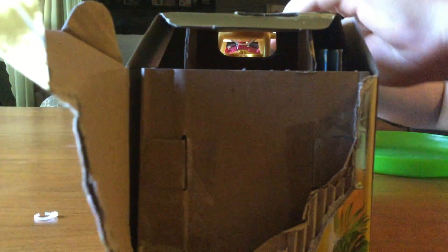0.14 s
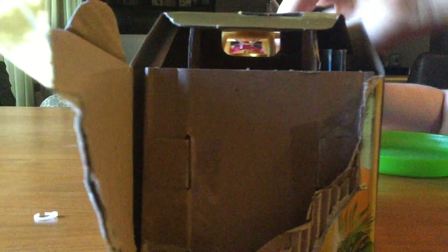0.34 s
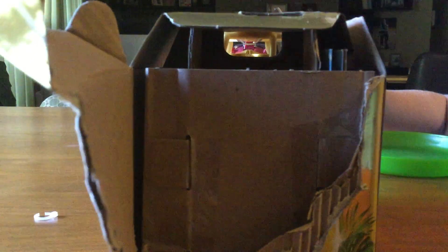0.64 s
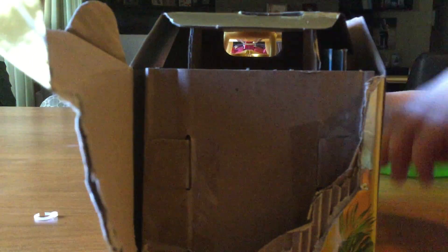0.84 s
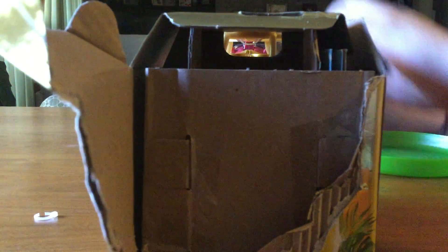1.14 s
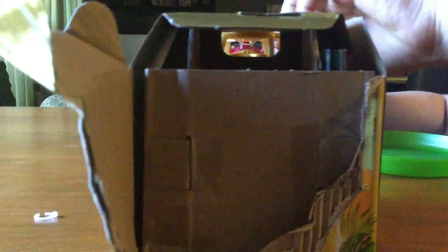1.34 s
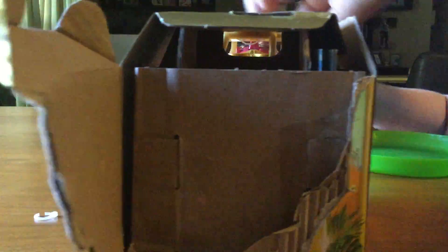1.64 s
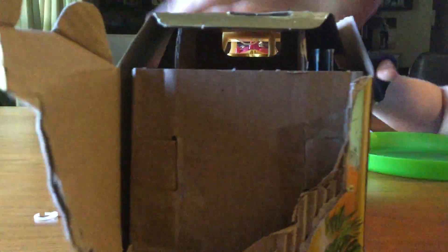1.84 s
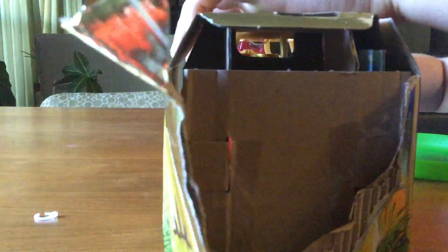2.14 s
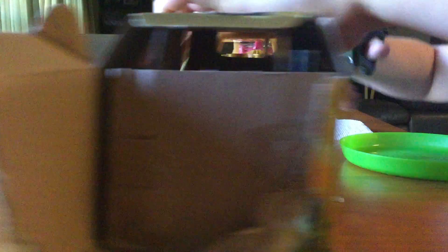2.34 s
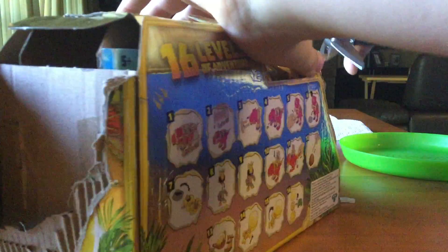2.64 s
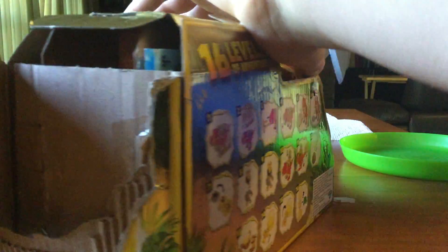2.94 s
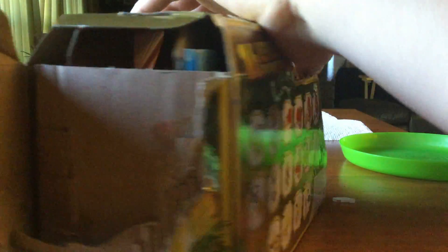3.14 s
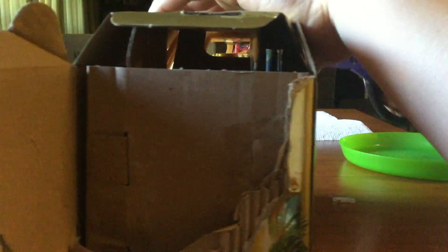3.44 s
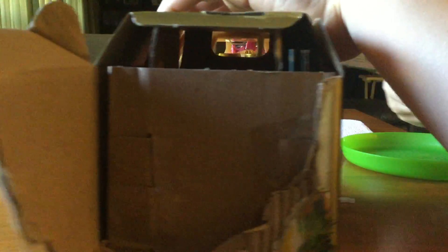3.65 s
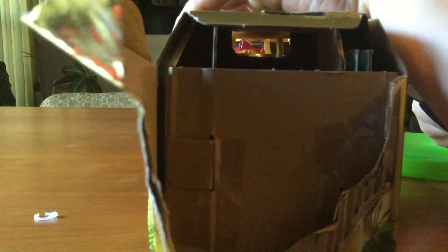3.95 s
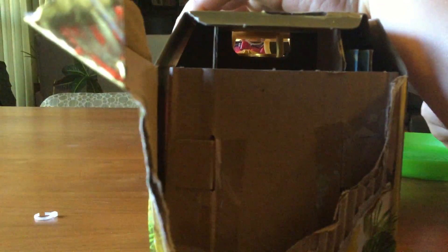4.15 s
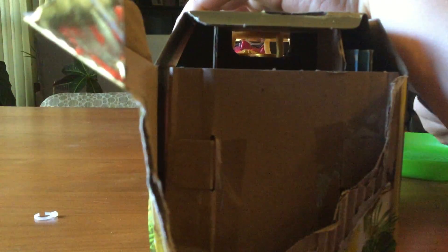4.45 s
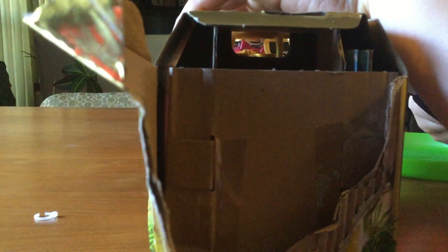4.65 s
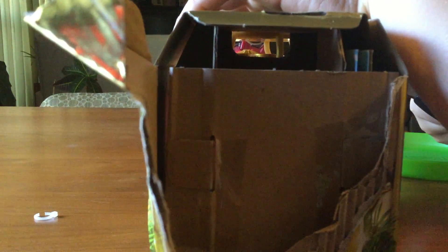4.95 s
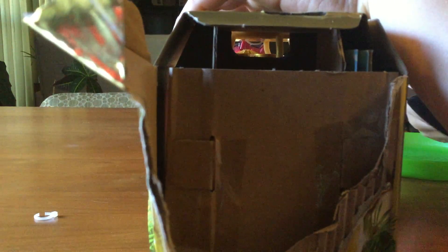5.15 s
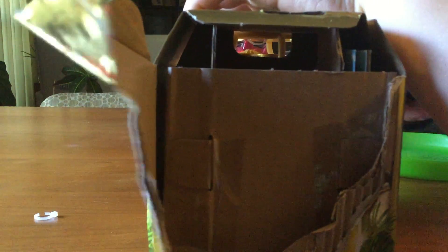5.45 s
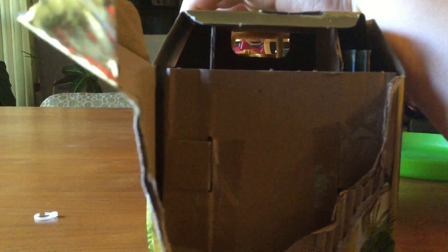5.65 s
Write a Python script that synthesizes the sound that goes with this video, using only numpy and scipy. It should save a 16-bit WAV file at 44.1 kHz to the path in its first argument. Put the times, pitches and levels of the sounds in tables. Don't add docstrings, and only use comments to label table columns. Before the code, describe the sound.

A close, small camera microphone in a quiet room picks up handling of a cardboard box on a wooden table. Light snips and card taps begin at 0.1 s, with more at 0.3 s, building to a hard double crack at 0.43-0.47 s as plastic snaps and the box walls knock. It goes nearly quiet, with faint crackles around 1.1-1.4 s and a small click at 1.6 s. At 1.88 s a very sharp snap lands with a dull thump, and the box starts to scrape. The dry, hissing drag swells, strongest around 2.4-2.7 s, with little clicks inside it. A deep double thud comes near 3.46 s, a crisp snap at 3.58 s, and the scraping fades by 4 s. Afterwards there are isolated taps at 4.6, 5.1 and 5.35 s, then a small cluster of cracks and rustle from 5.5 to 5.8 s, over soft room hush and short reflections.

```python
import sys
import numpy as np
from scipy import signal
from scipy.fft import rfft, irfft
from scipy.io import wavfile
from scipy.ndimage import uniform_filter1d

SR = 44100
rng = np.random.default_rng(int(sys.argv[2]) if len(sys.argv) > 2 else 0)


def materialize(psi):
    bounded = np.clip(np.atleast_2d(psi).T, -1, 1)
    quanta = np.round(bounded * 32767).astype(np.int16)
    wavfile.write(sys.argv[1], SR, quanta)


def invert_db(x):
    u = np.asarray(x, float) / 20
    return 10 ** u


N = 255339

# pitch_hz [Hz], level_db [dB], t60_s [s]
TABLE_MODES = [(40, -11.5, 0.23), (61, -8, 0.29), (83, -3.5, 0.11), (124, -1.5, 0.22), (166.8, -7.5, 0.23),
               (209, -4.5, 0.16), (288.4, -4, .12)]
# pitch_hz [Hz], level_db [dB], t60_s [s]
FLAP_MODES = [(380, 3, 0.035), (458, -7, 0.064), (545, 6, 0.027), (644, 6, 0.029), (784, 3.5, 0.04),
              (863, -7.5, .04)]
# pitch_hz [Hz], level_db [dB], t60_s [s]
WALL_MODES = [(1160, -1.5, 0.016), (1374, -9, 0.026), (1477, -4, 0.015), (1630, -2, 0.0098),
              (1766, -4, 0.013), (2125, -7.5, 0.011), (2528, -11, 0.009)]
# pitch_hz [Hz], level_db [dB], t60_s [s]
BLADE_MODES = [(7280, -1, 0.0011), (9400, -5, 0.0013), (11050, -1.5, 0.0017), (12900, -0.5, 0.001),
               (15200, -9, 0.0035)]
# time_s [s], pitch_hz [Hz], fizz_share_db [dB]
EDGE_PITCH = [(.35, 4200, -14.5), (1.2, 4200, -8), (1.65, 4170, -16), (2.24, 4290, -15), (2.34, 4710, -18),
              (2.54, 5300, -14), (2.69, 4740, -9.5), (2.84, 5480, -17), (2.93, 4580, -19.5),
              (3.05, 4340, -17.5), (3.4, 4790, -16.5), (3.56, 4250, -21), (3.7, 4230, -10),
              (3.84, 3936, -16.5), (4.1, 4220, -16), (5.55, 4290, -19.5)]


def evened(x):
    return x / np.sqrt(np.mean(x ** 2) + 1e-20)


def peaked(x, db, ms):
    power = uniform_filter1d(x ** 2, int(ms * SR / 1000))
    return invert_db(db) * x / np.sqrt(power.max())


def read(points, hz):
    f, value = np.transpose(points)
    return np.interp(np.log(hz + 1), np.log(f + 1), value)


def add(mix, s, sound):
    part = mix[round(s * SR):][:len(sound)]
    part += sound[:len(part)]


def in_time(rows):
    return sorted(rows, key=lambda row: round(row[0] * 200))


def ring(modes, near_hz=1000, fall_db=0, sign=-1):
    longest_s = max(t60 for *_, t60 in modes)
    t = np.arange(int(longest_s * SR)) / SR
    out = np.zeros(len(t))
    for k, (hz, db, t60) in enumerate(modes):
        level_db = db - fall_db * abs(np.log2(hz / near_hz))
        build_up = 1 - np.exp(-2.5 * hz * t)
        out += invert_db(level_db - 60 * t / t60) * np.sin(2 * np.pi * hz * t) * sign ** k * build_up
    return out


def breaks(ms, share):
    t = np.arange(2048) / SR
    clean = np.arange(len(t)) == 45
    run = rng.standard_normal((len(ms), len(t))) * (1 - np.exp(-t / 0.0029))
    run *= np.exp(-1000 * t / np.clip(ms, .3, 12)[:, None])
    return share * run / np.linalg.norm(run, axis=1, keepdims=True) + clean


def slips(per_s, size_db, flutter_db, flutter_ms):
    size = invert_db(size_db * np.minimum(rng.exponential(1, N), 4)) * rng.standard_normal(N)
    size *= rng.random(N) < per_s / SR
    width = int(flutter_ms * SR / 1000)
    flutter = uniform_filter1d(uniform_filter1d(rng.standard_normal(N), width), width)
    return size * invert_db(flutter_db * evened(flutter))


def swells(rows):
    t = np.arange(0, N / SR + .002, .001)
    power = np.zeros(len(t))
    for top, rise, fall, db in rows:
        away = np.where(t < top, (top - t) / rise, (t - top) / fall)
        power += invert_db(db - 26 * away ** 1.386) ** 2
    return np.interp(np.arange(N) / SR, t, np.sqrt(power))


def hush():
    # pitch_hz [Hz], level_db [dB per Hz]
    hush_colour = [(26, -36), (45, -6), (81, -1.5), (166, 0), (372, -10.5), (640, -20.5), (706, -14.5),
                   (880, -26), (1070, -22.5), (2730, -31.5), (4140, -26.5), (7470, -36), (8450, -33),
                   (14900, -38), (16000, -48.5)]
    hz = np.fft.rfftfreq(N, 1 / SR)
    spectrum = rfft(rng.standard_normal(N)) * invert_db(read(hush_colour, hz))
    return invert_db(-67) * evened(irfft(spectrum, N))


def room(x):
    # pitch_hz [Hz], t60_s [s]
    room_decay = [(100, 0.45), (500, .5), (1500, 0.53), (4500, 0.48), (9000, 0.45), (15000, 0.089)]
    # pitch_hz [Hz], level_db [dB]
    room_colour = [(100, 0), (400, -4), (1500, -4.5), (5000, -4.5), (14000, 1)]
    taps = np.zeros(SR)
    at = np.arange(300, SR - 20, 20)
    taps[at + rng.integers(0, 20, len(at))] = rng.choice([-1., 1.], len(at))
    hz, t, z = signal.stft(taps, SR, nperseg=256)
    gain = invert_db(read(room_colour, hz)[:, None] - 60 * t / read(room_decay, hz)[:, None])
    tail = signal.istft(z * gain, SR, nperseg=256)[1]
    return invert_db(-13) * signal.fftconvolve(x, tail / np.linalg.norm(tail))[:N]


def far_wall(x):
    t = np.arange(1500) / SR
    smear = rng.standard_normal(len(t)) * np.exp(-t / 0.021)
    echo = signal.oaconvolve(x, smear / np.linalg.norm(smear))[:N]
    return invert_db(-17.0) * np.roll(echo, round(0.031 * SR))


def rumble():
    # time_s [s], level_db [dB]
    weight = [(0.0, -45.5), (0.112, -55), (0.45, -77), (0.98, -74.5), (1.51, -58), (1.8, -70),
              (2.05, -58.5), (2.53, -54.5), (2.72, -52), (2.97, -48.5), (3.32, -63.5), (3.59, -41),
              (3.64, -57.5), (4.22, -64), (4.39, -70.5), (5.35, -76.5), (5.63, -51), (5.79, -67)]
    s, db = np.transpose(weight)
    shifts = slips(per_s=270, size_db=2.1, flutter_db=2.8, flutter_ms=40.0)
    hum = signal.oaconvolve(shifts, ring(TABLE_MODES))[:N]
    return invert_db(np.interp(np.arange(N) / SR, s, db) - 9.5) * evened(hum)


def bumps():
    # time_s [s], blow_db [dB], loudest_hz [Hz], contact_ms [ms]
    bump_events = [(0.113, -48, 262, 2.1), (0.348, -49, 190, 1.95), (0.441, -40, 299, 2.4),
                   (0.474, -46, 197.3, 2.05), (1.885, -39, 290, 2.14), (1.89, -31, 141, 4.6),
                   (1.988, -45, 261, 1.1), (2.494, -54, 122, 4), (2.769, -40.5, 98, 9.7),
                   (2.976, -45.5, 107, 1.9), (3.02, -46, 106, 2.3), (3.049, -53.5, 195, 1.9),
                   (3.459, -26, 109.6, 5), (3.47, -27, 86, 5.1), (3.742, -49.5, 301, 3),
                   (3.985, -40.5, 117.3, 1.6), (3.789, -52.5, 61, 8.1), (4.629, -43.5, 195, 2.34),
                   (4.981, -52.5, 119, 5.5), (5.063, -51.5, 184, 1.5), (5.079, -56.5, 76, 3.3),
                   (5.458, -55.5, 78.5, 5.4), (5.554, -43.5, 221, 6.3), (5.589, -64.5, 191, 3.5)]
    out = np.zeros(N)
    for s, db, hz, ms in bump_events:
        push = np.hanning(int(np.clip(ms, .5, 12) * SR / 1000))
        thud = signal.fftconvolve(push, ring(TABLE_MODES, hz, fall_db=9.5))
        add(out, s - 1.3 * ms / 1000, peaked(thud, db - 2.0, 19))
    return out


def patchy(x, patchy_db, lift_db):
    hz, t, z = signal.stft(x, SR, nperseg=256, noverlap=192)
    patches = uniform_filter1d(rng.standard_normal(z.shape), size=5, axis=0)
    patches = uniform_filter1d(patches, size=30, axis=1)
    s, peak_hz, _ = np.transpose(EDGE_PITCH)
    octaves = np.log2((hz[:, None] + 1) / np.interp(t, s, peak_hz))
    shape_db = patchy_db * evened(patches) + lift_db * np.exp(-(octaves / 0.65) ** 2)
    return signal.istft(z * invert_db(shape_db), nperseg=256, noverlap=192)[1][:N]


def drag():
    # pitch_hz [Hz], level_db [dB], t60_s [s]
    edge_modes = [(2790, -3.5, 0.0046), (3400, -5.5, 0.0061), (4000, -4.5, 0.0054), (4600, -4.5, 0.0067),
                  (5270, -2, 0.0034), (5620, -5, 0.0054), (6600, -4, 0.0035)]
    # fastest_s [s], rise_s [s], fall_s [s], hiss_db [dB]
    slide_events = [(.357, .012, 0.062, -62.5), (.418, .02, .03, -62), (1.15, .02, 0.063, -73),
                    (1.22, 0.018, 0.081, -71), (1.385, .065, 0.24, -73.5), (1.73, 0.066, 0.17, -67),
                    (1.854, 0.027, 0.0088, -60), (1.9, .02, 0.11, -60), (1.98, 0.14, 0.093, -58.5),
                    (2.11, 0.056, 0.12, -54), (2.16, 0.11, 0.087, -54.5), (2.345, 0.053, 0.25, -56.5),
                    (2.455, 0.081, 0.19, -45.5), (2.55, 0.17, 0.24, -47.5), (2.71, 0.24, 0.079, -52.5),
                    (1.878, 0.0099, .006, -51), (2.956, .085, 0.13, -57.5), (3.27, .22, 0.54, -60),
                    (3.47, 0.47, 0.071, -58), (3.6, 0.043, 0.088, -59.5), (3.874, 0.29, 0.26, -61.5),
                    (3.97, 0.38, 0.064, -63), (4.045, 0.023, 0.039, -67), (5.536, 0.04, 0.13, -62.5),
                    (5.598, 0.068, .045, -64.5), (5.764, 0.036, .015, -66.5)]
    # firmest_s [s], rise_s [s], fall_s [s], wall_db [dB], flap_db [dB]
    grind_events = [(.183, .055, 0.086, -78, -83), (0.356, 0.0097, .045, -61, -53),
                    (.428, 0.021, .004, -50, -48), (1.385, .055, 0.1, -74, -67.5),
                    (1.57, .015, .03, -64, -59.5), (1.73, 0.095, 0.16, -70, -70.5),
                    (1.9, 0.016, 0.065, -45, -46), (1.966, 0.12, 0.16, -51.5, -54.5),
                    (2.1, 0.1, 0.14, -58.5, -62), (2.16, 0.073, 0.1, -65, -57.5),
                    (2.42, 0.21, 0.26, -62.5, -67), (2.5, 0.12, 0.18, -56.5, -61.5),
                    (2.719, 0.37, 0.1, -58.5, -60), (2.99, .12, .11, -62, -60),
                    (3.27, 0.21, 0.45, -61, -69.5), (3.48, 0.11, 0.068, -60.5, -58),
                    (3.86, 0.39, 0.37, -64, -71), (3.979, 0.17, 0.067, -65.5, -70.5),
                    (1.858, .008, .012, -66, -56), (5.07, .01, 0.027, -63, -55),
                    (4.048, .012, .04, -69.5, -54), (5.57, 0.11, 0.087, -64, -59.5),
                    (5.765, 0.042, 0.031, -61, -66)]
    scrape = slips(per_s=14000, size_db=0.89, flutter_db=1.1, flutter_ms=53.0)
    scrape = patchy(scrape, patchy_db=2.47, lift_db=8.5)
    bodies = (edge_modes, WALL_MODES, BLADE_MODES, FLAP_MODES)
    edge, wall, fizz, flap = [evened(signal.oaconvolve(scrape, ring(body))[:N]) for body in bodies]
    s, _, fizz_db = np.transpose(EDGE_PITCH)
    fizz_gain = invert_db(np.interp(np.arange(N) / SR, s, fizz_db))
    hiss = swells(slide_events) * (edge + fizz_gain * fizz)
    *when, wall_db, flap_db = np.transpose(grind_events)
    return hiss + swells(zip(*when, wall_db)) * wall + swells(zip(*when, flap_db)) * flap


def knocks():
    # time_s [s], wall_db [dB], flap_db [dB], loudest_hz [Hz], length_ms [ms]
    knock_events = [(0.0901, -44, -41.5, 677, 4.6), (0.1173, -28, -46, 1630, 2.1),
                    (0.2924, -38.5, -58, 1520, 1.6), (0.3466, -34, -40.5, 410, 2.5),
                    (0.4322, -18, -33.5, 1399, 4.2), (0.4731, -16, -68, 1570, 3.5),
                    (0.4766, -26, -32.5, 761, 2.9), (1.5951, -48, -52, 1116, 3.5),
                    (1.8816, -13.5, -38.5, 1500, 1.05), (1.9005, -47, -40, 1250, 1.8),
                    (1.9925, -52, -41.5, 536, 3.6), (2.151, -31.5, -47.5, 1160, 3.3),
                    (2.2603, -46.5, -56.5, 1010, 3.2), (2.596, -38, -51, 799, 3.5),
                    (2.7214, -39.5, -53, 1695, 1.05), (3.019, -44, -46.5, 555, 1.6),
                    (3.4979, -44.5, -52, 1070, 3.2), (3.5813, -36, -41.5, 553, 2),
                    (3.9793, -40.5, -46, 732, 4.3), (4.6225, -42, -41, 629, 6),
                    (5.1329, -40.5, -64.5, 1170, 1.24), (5.347, -45.5, -76, 1204, 2.5),
                    (5.5492, -36, -44.5, 1153, 4.2), (5.5907, -36.5, -42.5, 680, 3.1)]
    # time_s [s], wall_db [dB], flap_db [dB], loudest_hz [Hz]
    tap_events = [(0.1576, -49, -64, 1670), (1.3619, -52.5, -54.5, 660), (1.389, -49.5, -65, 360),
                  (1.484, -62, -62.5, 565), (1.5678, -61, -58, 1110), (1.7444, -51.5, -57, 617),
                  (2.7685, -59, -55.5, 533), (2.8713, -51.5, -51.5, 570), (2.9046, -51, -51.5, 589),
                  (2.9465, -56, -51, 611), (4.0592, -53, -51, 596), (4.898, -60, -66.5, 492),
                  (5.0594, -46, -53.5, 380), (5.5306, -51.5, -57, 627), (5.5479, -53, -49.5, 356),
                  (5.745, -52, -59.5, 727), (5.7612, -50, -60, 1480)]
    out = np.zeros(N)
    rows = in_time(knock_events + [(*tap, 2.5) for tap in tap_events])
    runs = breaks(np.transpose(rows)[-1], share=1.0)
    for (s, wall_db, flap_db, hz, ms), run in zip(rows, runs):
        wall = signal.fftconvolve(run, ring(WALL_MODES, hz, fall_db=11.5, sign=0.85))
        flap = signal.fftconvolve(run, ring(FLAP_MODES, hz, fall_db=13.5, sign=0.92))
        add(out, s, peaked(wall, wall_db - 8.0, 2.5))
        add(out, s, peaked(flap, flap_db + 0.5, 2.7))
    return out


def snaps():
    # pitch_hz [Hz], level_db [dB], t60_s [s]
    plastic_modes = [(3270, 1.5, 0.0033), (3700, -2.5, 0.0074), (3980, 4, 0.0033), (4580, 0, 0.0057),
                     (5200, 2, 0.0037), (6140, -1.5, 0.0036), (6830, -5, 0.0038)]
    # time_s [s], snap_db [dB], brightest_hz [Hz], blade_db [dB], length_ms [ms]
    cut_events = [(0.0898, -42.5, 4600, -83, 2.5), (0.1177, -37.5, 4070, -64, 2.7),
                  (0.2926, -41, 3060, -51, 2.9), (0.3044, -39.5, 5460, -63, 2.9),
                  (0.3462, -33.5, 4870, -48.5, 1.8), (0.4308, -21.5, 3170, -38.5, 4.6),
                  (0.4738, -46, 2700, -24.5, 3.2), (0.4729, -16.5, 4290, -54, 4),
                  (1.1303, -41, 4630, -59, 2.7), (1.595, -46, 3800, -78, 1.9),
                  (1.8528, -40.5, 4060, -70, 1.7), (1.8811, -16, 3870, -62, 0.96),
                  (1.9795, -38.5, 4400, -60, 1.6), (2.48, -35, 4630, -55, 2.9),
                  (2.7661, -31, 6510, -39.5, 1.8), (2.9499, -36, 4530, -74, 1.8),
                  (3.4995, -44, 5200, -59, 0.95), (3.5809, -27.5, 3870, -58.5, 2.6),
                  (3.9791, -43, 4040, -64, 8.8), (4.6228, -44, 4950, -74.5, 5),
                  (5.1327, -42, 3070, -55, 1.36), (5.3483, -44, 3810, -60.5, 1.16),
                  (5.5608, -40, 3560, -64, 2.1), (5.591, -31, 4010, -75, 1.16)]
    # time_s [s], snap_db [dB], brightest_hz [Hz]
    crack_events = [(0.167, -51, 5270), (0.183, -51, 4300), (0.1986, -59, 4440), (0.319, -55, 4060),
                    (1.142, -48.5, 4590), (1.2178, -53, 4540), (1.232, -59, 4670), (1.26, -53, 4550),
                    (1.2825, -61, 4760), (1.3097, -57, 4660), (1.3893, -53.5, 4550), (2.259, -50, 4570),
                    (2.874, -52, 2700), (3.015, -47, 4000), (3.7824, -64, 3850), (4.0467, -45.5, 4360),
                    (4.6636, -73, 5040), (5.0574, -47, 3220), (5.5298, -48, 4550), (5.5438, -42.5, 3940),
                    (5.6063, -47, 3900), (5.757, -52, 4320)]
    out = np.zeros(N)
    small = [(s, db, hz, -74.5 + 0.1 * (db + 49.5), 2.6) for s, db, hz in crack_events]
    rows = in_time(cut_events + small)
    runs = breaks(np.transpose(rows)[-1], share=1.9)
    for (s, db, hz, blade_db, ms), run in zip(rows, runs):
        plastic = signal.fftconvolve(run, ring(plastic_modes, hz, fall_db=11.0))
        blade = signal.fftconvolve(run, ring(BLADE_MODES))
        add(out, s, peaked(plastic, db - 10.0, 2))
        add(out, s, peaked(blade, blade_db - 3.0, 0.78))
    return out


def scene():
    hits = snaps() + knocks() + bumps()
    scrape = drag()
    echoing = hits + invert_db(-9.5) * scrape
    mix = hits + scrape + far_wall(echoing) + room(echoing) + rumble() + hush()
    return mix[None]


def band_limit(x):
    return signal.sosfilt(signal.butter(12, 16470, fs=SR, output="sos"), x)


def record(dry):
    edge = signal.firwin(511, 15850, window=("kaiser", 9), fs=SR)
    mix = signal.oaconvolve(dry, edge[None], "same")
    return band_limit(mix)


dry = scene()
out = record(dry)
materialize(out)
```